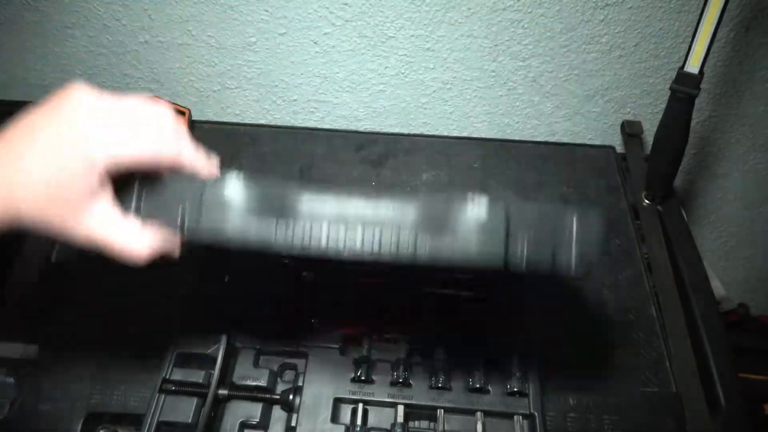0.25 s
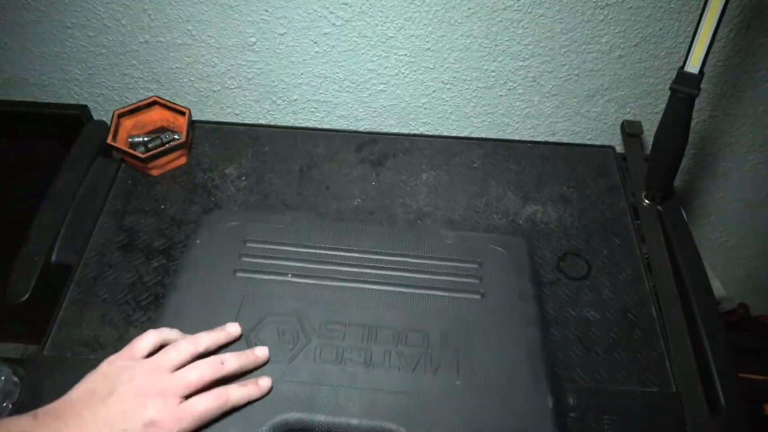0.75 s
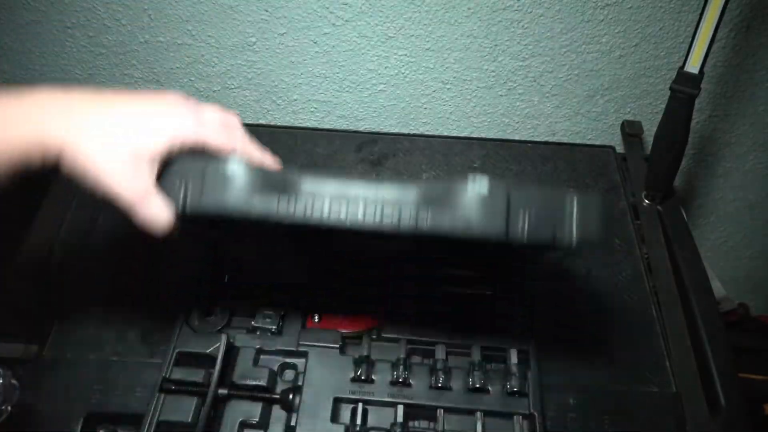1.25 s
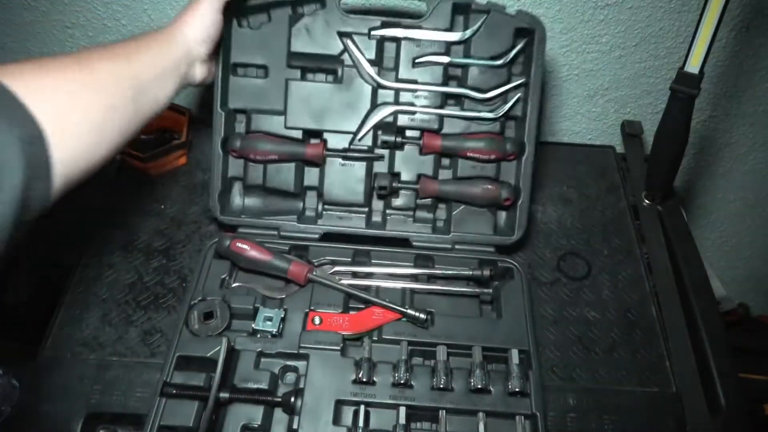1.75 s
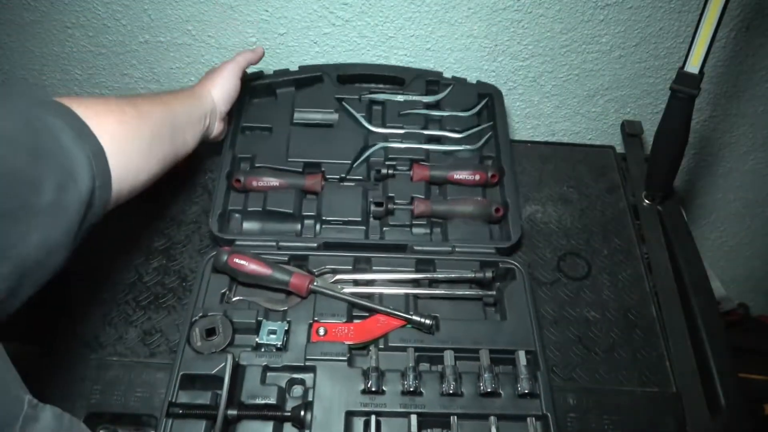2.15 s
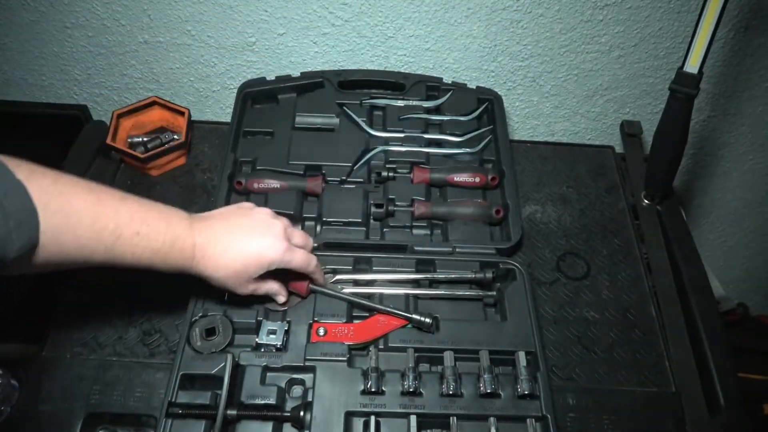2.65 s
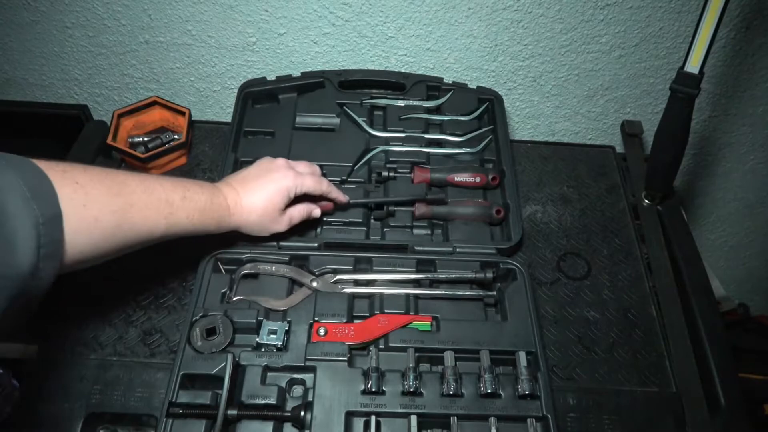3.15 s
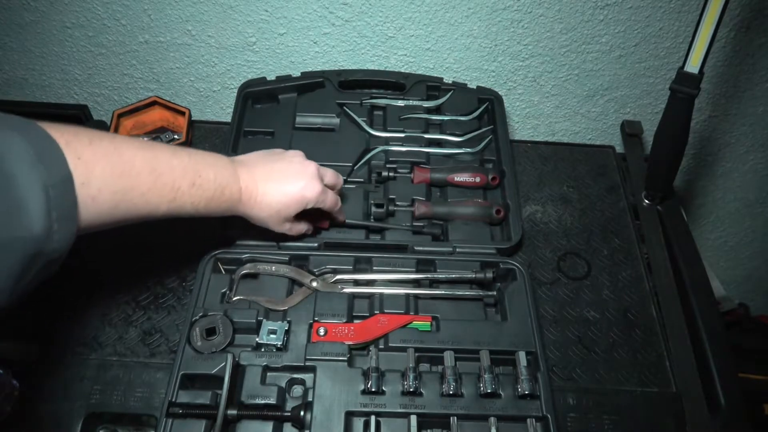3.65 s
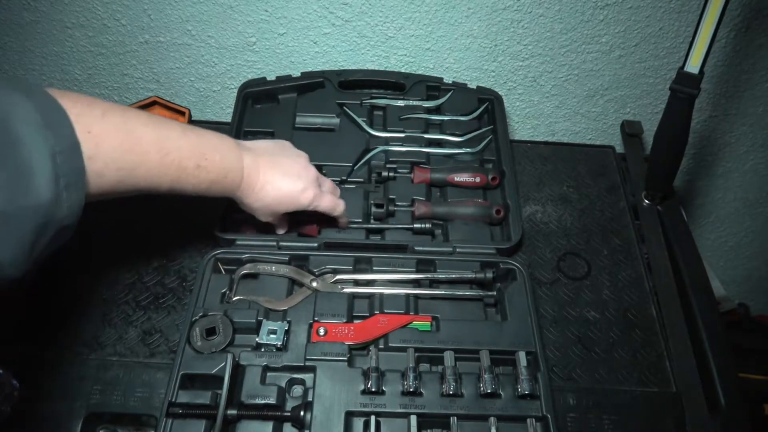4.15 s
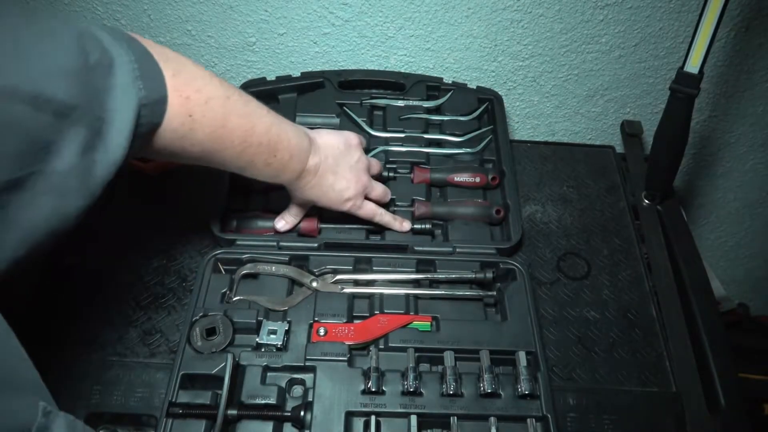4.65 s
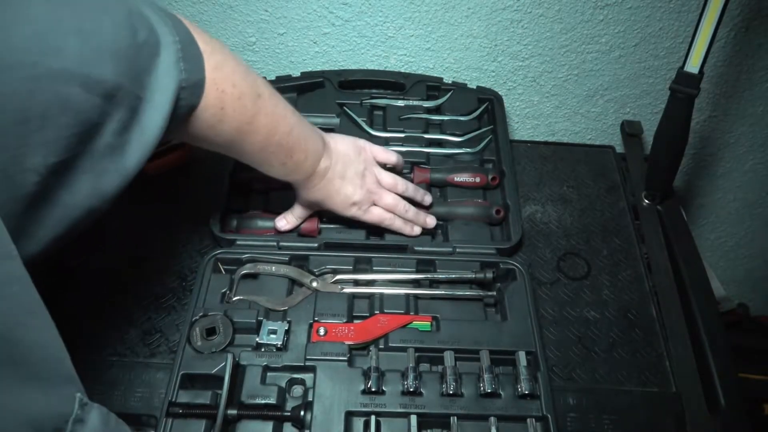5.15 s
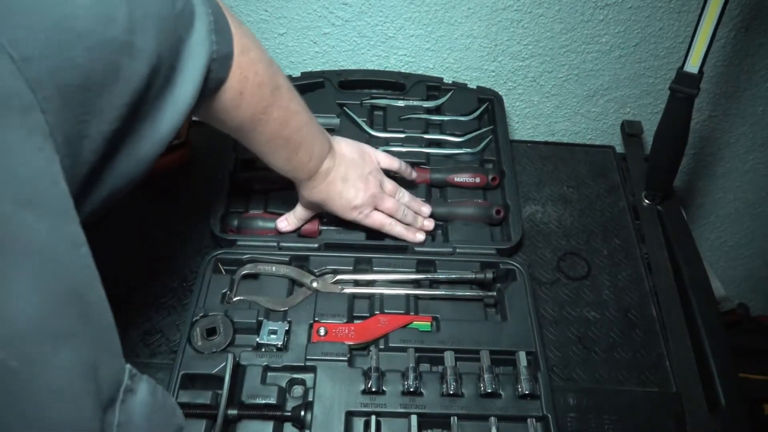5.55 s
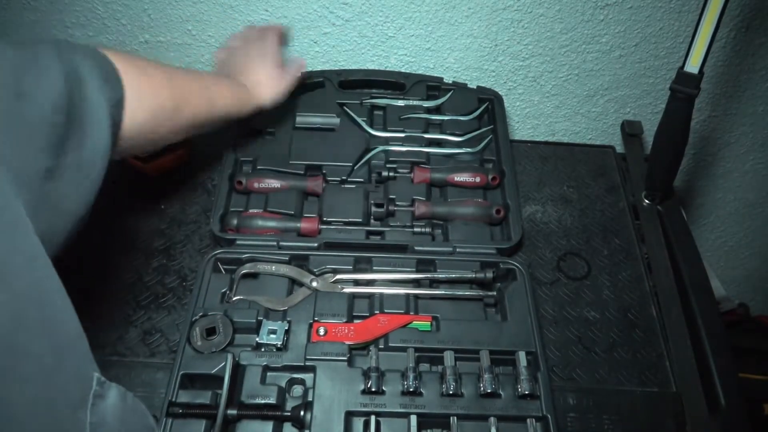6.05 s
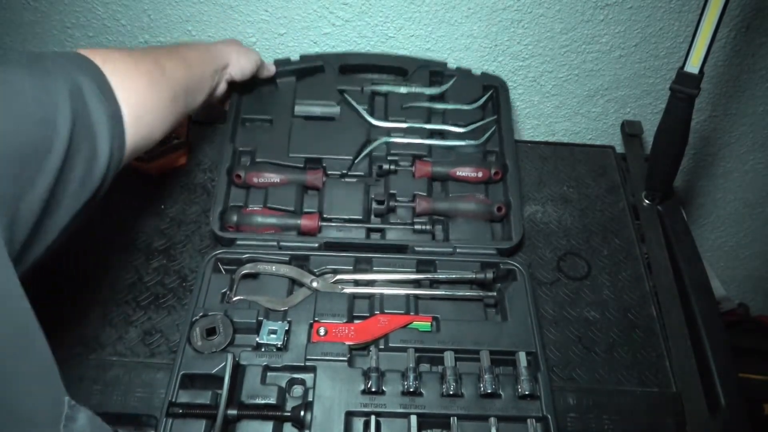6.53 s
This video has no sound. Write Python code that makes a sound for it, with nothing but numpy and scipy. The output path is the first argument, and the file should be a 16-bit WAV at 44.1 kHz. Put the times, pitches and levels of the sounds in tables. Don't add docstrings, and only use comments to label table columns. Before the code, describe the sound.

Close on a workshop bench, a hollow plastic tool case slams shut with rattling tools and a brief steel ring inside. After a quiet moment of rubbing hands, it is thrown open with hard clacks. A loose tool then knocks and clatters into place, with small clicks and scrapes, before one loud snap and a short judder as it is forced home. Light scrapes end it over faint room hum.

```python
import sys
import numpy as np
from scipy import signal
from scipy.fft import rfft, irfft
from scipy.io import wavfile
from scipy.ndimage import uniform_filter1d, minimum_filter1d

SR = 44100
rng = np.random.default_rng(int(sys.argv[2]) if len(sys.argv) > 2 else 0)


def master(y):
    cut = np.clip(np.atleast_2d(y).T, -1, 1)
    pcm = np.round(cut * 32767)
    wavfile.write(sys.argv[1], SR, pcm.astype(np.int16))


def level_to_linear(level):
    exponent = np.asarray(level, float) / 20
    return 10 ** exponent


N = 299288

# pitch_hz, level_db, t60_s
CASE_MODES = [(183, -7, 0.211), (246.26, -9, 0.1716), (349.63, -0.5, 0.0866), (475.2, -4, 0.0996),
              (559.05, -6.5, 0.1073), (724.84, -5.5, 0.066), (907.67, -7.5, 0.0606), (1129.5, -8.5, 0.0305),
              (1656.6, -7, 0.0197), (1980, -13, 0.028), (2598, -9, 0.0106), (3430, -41.5, 0.03706)]
# frequency_hz, level_db (per Hz)
CONTACT_COLOUR = [(120, -41), (400, 16.5), (1000, 15.5), (2000, 13), (4000, 2.5), (6500, -4.5),
                  (9000, -18.5), (13000, -16.5), (17000, -73)]


def evened(x):
    return x / np.sqrt(np.mean(x ** 2) + 1e-20)


def read(points, hz):
    f, value = np.transpose(points)
    return np.interp(np.log(hz + 1), np.log(f + 1), value)


def add(mix, s, sound):
    part = mix[round(s * SR):][:len(sound)]
    part += sound[:len(part)]


def coloured(x, spectrum):
    gain = level_to_linear(read(spectrum, np.fft.rfftfreq(len(x), 1 / SR)))
    return irfft(rfft(x) * gain, len(x))


def highpassed(x, order, edge_hz):
    return signal.sosfilt(signal.butter(order, edge_hz, "high", fs=SR, output="sos"), x)


def fine_fizz(x, edge_hz):
    return signal.sosfiltfilt(signal.butter(2, edge_hz, "high", fs=SR, output="sos"), x)


def patchy(spectrum, patchy_db, flicker_db):
    frames, hz = N // 128 + 5, np.fft.rfftfreq(512, 1 / SR)
    real, imaginary, patches = rng.standard_normal((frames, 257, 3)).T
    patches = uniform_filter1d(patches, size=10, axis=0)
    patches = evened(uniform_filter1d(patches, size=14, axis=1))
    flicker = evened(uniform_filter1d(rng.standard_normal(frames), size=4))
    level_db = read(spectrum, hz)[:, None] + patchy_db * patches + flicker_db * flicker
    z = (real + 1j * imaginary) * level_to_linear(level_db)
    return evened(signal.istft(z, nperseg=512, noverlap=384)[1][:N])


def ring(modes, t):
    hz, db, t60 = np.transpose(modes)[:, :, None]
    return (level_to_linear(db - 60 * t / abs(t60)) * np.sin(2 * np.pi * hz * t)).sum(0)


def swell(peak_s, rise_s, fall_s):
    t = np.arange(-abs(rise_s), 2 * abs(fall_s), 1 / SR)[:SR]
    rise = np.sin(np.pi / 2 * np.clip(1 + t / abs(rise_s), 0, 1)) ** 2
    return peak_s + t, rise * level_to_linear(-30 * np.maximum(t, 0) / abs(fall_s))


def workshop_air():
    # frequency_hz, level_db (per Hz)
    air_colour = [(12, -42), (20, -11.5), (86, 2), (304, -15.5), (370, -6.5), (402, -33.5), (1590, -14.5),
                  (1730, -21.5), (3300, -24.5), (15000, -33), (16300, -43)]
    # pitch_hz, level_db (rms)
    far_hums = [(80.7, -56.5), (371.4, -55), (1556, -64.5)]
    t = np.arange(N) / SR
    waver = evened(uniform_filter1d(rng.standard_normal((len(far_hums), N)), size=3000, axis=1))
    out = level_to_linear(-47.5) * evened(coloured(rng.standard_normal(N), air_colour))
    for (hz, level_db), w in zip(far_hums, waver):
        out += level_to_linear(level_db + 3.0 + 3.18 * w) * np.sin(2 * np.pi * hz * t + 0.734 * w)
    return out


def rubbing():
    # time_s, speed_db (as rustle), pressure_db (as low shuffle)
    strokes = [(0.0, -39, -33), (0.131, -42.5, -41), (0.24, -43, -36), (0.6, -51, -34), (0.79, -38, -37.5),
               (0.94, -46, -32.5), (1.13, -64, -38.5), (1.337, -42, -44), (1.49, -41, -40), (1.8, -42, -40),
               (1.93, -43, -38), (2.11, -36.5, -39.5), (2.44, -57, -44), (3.31, -54.5, -47.5),
               (4.67, -55.5, -52), (5.05, -54, -47.5), (5.9, -50.5, -43.5), (6.79, -45.5, -41.5)]
    # peak_s, rise_s, fall_s (by 30 dB), speed_db, pressure_db
    palm_shoves = [
        (0.429, 0.0525, 0.2877, -18.5, -23.5),
        (0.51, 0.043, -0.0124, -60.5, -25),
        (0.678, 0.173, -0.07, -76.5, -27),
        (1.699, 0.26, 0.29, -34.5, -55),
        (2.27, 0.085, 0.0958, -26.5, -12.5),
        (3.853, 0.1, -0.027, -29, -32.5),
        (4.039, 0.034, 0.0678, -39, -19.5),
        (4.4, 0.126, 0.48, -71.5, -37),
        (5.25, 0.158, 0.767, -70, -39),
        (5.56, 0.066, 0.11, -28.5, -28),
    ]
    # frequency_hz, level_db (per Hz)
    rustle_colour = [(290, -35), (500, 11), (596, -15.5), (833, 7.5), (1080, 5), (2210, 5), (5870, -3),
                     (13300, -26.5), (16300, -36.5)]
    # frequency_hz, level_db (per Hz)
    shuffle_colour = [(30, -46), (70, -19.5), (150, 5.5), (300, -3), (600, -5.5), (1200, -18.5),
                      (2500, -41.5)]
    s, *columns = np.transpose(strokes)
    speed, pressure = (level_to_linear(np.interp(np.arange(N) / SR, s, c)) for c in columns)
    for *shape, speed_db, pressure_db in palm_shoves:
        t, gain = swell(*shape)
        add(speed, t[0], level_to_linear(speed_db) * gain)
        add(pressure, t[0], level_to_linear(pressure_db) * gain)
    fizz_db = np.minimum(6.5 + 0.7863 * 20 * np.log10(speed / pressure), 21)
    rustle = patchy(rustle_colour, 1.71, 1.0)
    bright_rustle = rustle + (level_to_linear(fizz_db) - 1) * fine_fizz(rustle, 8000)
    return speed * bright_rustle + pressure * patchy(shuffle_colour, 1.0, 2.6)


def knock(crack_db, thud_db, thud_hz, t60, tilt_db):
    t = np.arange(4096) / SR
    colour = [(hz, db + tilt_db * np.log2(max(hz, 900) / 2500)) for hz, db in CONTACT_COLOUR]
    burst = (level_to_linear(-60 * t / 0.01774) + level_to_linear(-6.0 - 60 * t / 0.0306)) * (1 - np.exp(-t / 0.000305))
    grains = rfft(rng.standard_normal(len(t)) * burst)
    grains /= uniform_filter1d(abs(grains), size=15)
    crack = coloured(irfft(grains), colour) * level_to_linear(-60 * t / 0.312) * (1 - np.exp(-t / 0.0000467))

    modes = np.tile(CASE_MODES, (2, 1)) * [1, 1, abs(t60) / 0.0509]
    spread = rng.standard_normal(modes.shape) * modes * [.07, 0, .15]
    modes += spread + rng.standard_normal(modes.shape) * [0, 3.0, 0]
    modes[:, 1] -= 4.1 * np.maximum(np.log2(thud_hz / modes[:, 0]), 0)
    modes[:, 0] *= rng.choice([-1, 1], len(modes))
    panel = ring([(thud_hz, 9.0, t60), (thud_hz * rng.uniform(1.05, 1.12), 4.0, t60)], t)
    thud = (ring(modes, t) + panel) * (1 - np.exp(-t / 0.00041))
    return level_to_linear(crack_db) * (crack / abs(crack).max() + level_to_linear(thud_db + 4.0) * thud / abs(thud).max())


def blows():
    # start_s, crack_peak_db, thud_over_crack_db, thud_hz, tilt_db_per_octave
    slams = [(0.196, -12.5, -15, 423, -1), (0.2581, 7, -9.5, 293, -0.5), (0.3515, -11.5, 2.5, 482, -0.5),
             (0.3932, -5.5, 10.5, 505.8, 6.5), (0.4184, -7, 1, 528, -2), (0.4569, -3.5, 3.5, 455, 8.5),
             (0.5005, -10.5, 3.5, 472, -14.5), (0.5132, 0.5, -8, 525, -6), (0.6021, -19, 2, 719, -6),
             (0.6225, -9, 5.5, 488.6, -3), (1.0061, -11.5, -2, 486.6, -3.5), (2.152, -13, 2.5, 387.3, -2),
             (2.1893, -18.5, -19.5, 478.1, 0), (2.2108, -8, -4.5, 393, -2), (2.2628, 4.5, -12, 485, 1),
             (2.3135, -6.5, -1.5, 524, -1), (2.3591, -8.5, 2, 341.6, -1), (2.7564, -8, -8, 705.3, 1),
             (3.0769, 2.5, -3.5, 369.3, -1), (3.379, 8.5, -6, 355, -1.5), (3.4239, 2, -11, 375, 2.5),
             (3.8636, -5.5, -15.5, 451.1, 0.5), (4.0246, -14.5, 7, 352, 1), (5.4805, 5, -11, 221, 2)]
    lid_taps = [(0.211, -3.5, -9.5, 403, -5), (0.2665, -4, 3.5, 329, -5.5), (0.3095, -15, 16, 464.8, 2.5),
                (0.4401, 2, -1.5, 463.4, -13), (0.5397, -7, -3.5, 465.3, -15),
                (0.6548, -27.5, -12.5, 492.2, 8), (0.8632, -28, 1.5, 547.6, 1),
                (1.008, -13.5, -6.5, 862.6, -1), (1.9945, -26, -5.5, 1483, -1.5),
                (2.0298, -29, -2.5, 234.6, -6), (2.1257, -24.5, 0, 388.5, -4.5),
                (2.1688, -9.5, -9, 336, -2), (2.2787, -4.5, 0.5, 239.7, -15.5), (2.3335, -3, 1.5, 448, -3)]
    tool_taps = [(2.6775, -27, -7, 636, -3), (2.7106, -15.5, -2.5, 302.4, -6), (3.0962, -9, -10, 378, -2),
                 (3.5995, -34, 6.5, 339, -1.5), (3.7825, -17.5, -12.5, 2846, -11),
                 (3.7934, -16, 2.5, 340.5, -18), (3.9953, -16, -22, 360, -0.5), (4.0103, -9.5, -3, 215, 3),
                 (4.0434, -6.5, -17, 330, -5.5), (4.1669, -26, 5, 355, -13.5),
                 (4.1757, -9.5, -0.5, 369.8, -8.5), (4.368, -9.5, 2, 370.6, -7), (4.5186, -19.5, 3, 383, 1),
                 (5.008, -38, 2, 197.5, 9.5), (5.1451, -39, 5.5, 329, 8.5), (5.218, -38, 12, 266.4, -17.5),
                 (5.373, -31.5, 11.5, 333.5, 4.5), (5.4082, -41, 14.5, 227, -10),
                 (5.7494, -48, 15.5, 478, -15.5), (5.8365, -34, 2, 365.5, -3),
                 (5.8721, -26, 3.5, 319.5, -27), (5.876, -31, 4, 1097, -17.5),
                 (6.5338, -32, 7.5, 375.8, -14)]
    out = np.zeros(N)
    for table, force_db, t60 in (slams, 5, 0.0458), (lid_taps, 0, 0.0832), (tool_taps, 0, 0.0702):
        for s, crack_db, thud_db, thud_hz, tilt_db in table:
            ring_s = t60 * level_to_linear(-0.11 * tilt_db)
            add(out, s, level_to_linear(force_db) * knock(crack_db, thud_db, thud_hz, ring_s, tilt_db))
    return out


def struck_parts():
    # start_s, peak_db, pitch_hz, t60_s
    part_rings = [(0.1982, -18.5, 1480, 0.029), (0.2, -14, 349, 0.064), (0.3495, -3, 1943, 0.0122),
                  (0.3532, -1.5, 430, 0.029), (0.2665, 4.5, 749, 0.034), (0.329, -11.5, 828, 0.033),
                  (0.4185, 1.5, 825, 0.038), (0.4188, -9.5, 2619, 0.0117), (0.4575, 0.5, 841, 0.05),
                  (0.459, -2, 466, 0.044), (0.5002, -1, 2040, 0.0135), (0.5122, 4.5, 968, 0.0393),
                  (0.5125, -2.5, 1890, 0.0192), (0.522, -13, 3023, 0.167), (0.603, -25, 3023, 0.077),
                  (0.608, -2.5, 512.6, 0.054), (0.6225, 2.5, 533, 0.02931), (0.654, -9.5, 565.7, 0.068),
                  (1.0075, -10, 2414, 0.0152), (1.0072, -15, 2003, 0.0255), (1.012, -17.5, 409.2, 0.318),
                  (1.008, -10, 844.4, 0.0645), (2.1525, 0, 411, 0.037), (2.1893, -7.5, 1535, 0.0245),
                  (2.169, -18, 3710, 0.017), (2.199, -3.5, 400, 0.041), (2.199, -6.5, 662, 0.0275),
                  (2.2, -7, 1008, 0.031), (2.211, -4.5, 1484, 0.026), (2.2578, 9, 392.5, 0.032),
                  (2.258, 0.5, 1696, 0.022), (2.257, -8.5, 3051, 0.0105), (2.257, -8.5, 5570, 0.0115),
                  (2.2588, -16, 7602, 0.00782), (2.263, 0, 1970, 0.0104), (2.279, -3, 1520, 0.0133),
                  (2.291, -13, 1905, 0.01422), (2.304, 2, 333, 0.0503), (2.304, -4, 559, 0.025),
                  (2.305, -4.5, 1476, 0.0215), (2.305, -5, 2631, 0.0138), (2.314, -3, 1497, 0.0212),
                  (2.335, -12.5, 1786, 0.014), (2.341, -5.5, 451, 0.036), (2.36, -6, 1753, 0.0167),
                  (2.7115, -26.5, 771, 0.064), (2.757, -9, 743.7, 0.0306), (2.757, -16.5, 1390, 0.019),
                  (2.762, -13.5, 1686, 0.02), (2.818, -31.5, 2175, 0.033), (2.818, -31.5, 3902, 0.064),
                  (2.822, -30, 4590, 0.03125), (3.076, -15.5, 1307, 0.0105), (3.0778, -8, 2956, 0.0136),
                  (3.088, -2.5, 388.4, 0.035), (3.098, -9.5, 413.9, 0.035), (3.096, -8, 1952, 0.015),
                  (3.096, -8, 1301, 0.052), (3.115, -6, 300.6, 0.049), (3.379, 7, 1035, 0.017),
                  (3.379, 14, 1738, 0.0159), (3.379, 5.5, 3702, 0.0164), (3.379, 3.5, 5317, 0.0173),
                  (3.407, -3, 997, 0.026), (3.424, 2.5, 930, 0.0124), (3.424, -1.5, 2526, 0.0172),
                  (3.424, 3.5, 4890, 0.0116), (3.425, 0, 6020, 0.0123), (3.423, -3, 7600, 0.0104),
                  (3.864, -6.5, 1790, 0.013), (3.864, -3, 2560, 0.0157), (3.864, -12, 3140, 0.009),
                  (3.871, -7, 447, 0.0505), (4.024, -10, 774, 0.0215), (4.094, -21, 2870, 0.0137),
                  (4.1214, -28, 2890, 0.036), (4.1845, -26.5, 6270, 0.0089), (4.1837, -10.5, 373, 0.045),
                  (4.2387, -33, 1391, 0.0157), (4.337, -27.5, 995, 0.021), (4.367, -11, 734, 0.019),
                  (4.374, -8.5, 385, 0.047), (4.491, -18.5, 6162, 0.0096), (4.526, -10, 407.4, 0.0378),
                  (5.2722, -30, 1968, 0.056), (5.4805, 8.5, 648, 0.0178), (5.4816, 4, 1642, 0.0125),
                  (5.48, 0.5, 3375, 0.011), (5.4802, 9, 1139, 0.0138), (5.489, -2.5, 341.8, 0.175),
                  (5.522, -11, 337.2, 0.102), (5.55, -9.5, 544.8, 0.087), (5.573, -12.5, 539.3, 0.061),
                  (5.579, -9.5, 1152, 0.0314), (5.598, -12.5, 343.3, 0.114)]
    out, t = np.zeros(N), np.arange(6144) / SR
    for s, peak_db, hz, t60 in part_rings:
        pair = ring([(hz, peak_db - 2.0, t60), (hz * 0.99535, peak_db - 9.5, t60 * 0.68)], t)
        add(out, s, pair * (1 - np.exp(-t / 0.00025)))
    return out


def rattle(peak_s, rise_s, fall_s, level_db, bright_db, per_s=900):
    t, gain = swell(peak_s, rise_s, fall_s)
    modes = CASE_MODES * np.array([1, 1, .5])
    modes[:, 1] -= 2.7 * np.maximum(np.log2(380 / modes[:, 0]), 0)
    chance, luck, sign = rng.random((SR, 3))[:len(t)].T
    size = level_to_linear(5.45 * np.minimum(-np.log(1 - luck), 4))
    bounces = size * (chance < per_s / SR) * np.sign(sign - .5)
    body = evened(signal.fftconvolve(bounces, ring(modes, np.arange(4096) / SR))[:len(t)])
    hiss = 0.68 * rng.standard_normal(SR)[:len(t)] * bounces.std()
    ticks = evened(coloured(bounces + hiss, CONTACT_COLOUR[:-2] + [(16000, -41.5)]))
    return t[0], level_to_linear(level_db - 13.5) * gain * (body + level_to_linear(bright_db - 8.0) * ticks)


def rattles():
    # peak_s, rise_s, fall_s (by 30 dB), level_db, brightness_db
    shakes = [(0.222, 0.0309, 0.18, -2.5, -8.5), (0.29, 0.0244, 0.2213, 5.5, -2),
              (0.405, 0.05, 0.0977, -2, 2), (0.46, 0.0335, 0.5, -30.5, 19.5), (0.542, 0.074, -1.4, -30, -2),
              (0.626, 0.0366, 0.22, -18.5, -1), (2.145, 0.03095, 0.2063, -27, 18.5),
              (2.204, 0.01874, 0.0178, 5, 6.5), (2.325, 0.0562, 0.0732, -1.5, 12.5),
              (3.448, 0.06, 0.1524, 1.5, 2.5), (3.8, 0.02206, 0.15, -5.5, 1), (3.87, 0.02173, 0.0381, 3, 4),
              (4.022, 0.03576, 0.0506, 2.5, 0.5), (5.481, 0.0088, 0.0156, 3, 14)]
    judders = [
        (5.575, 0.11, 0.1184, -2.5, 8),
    ]
    out = np.zeros(N)
    for row in shakes:
        add(out, *rattle(*row))
    for row in judders:
        add(out, *rattle(*row, per_s=4000))
    return out


def snaps():
    # start_s, peak_db, lower_edge_hz, t60_s
    edge_snaps = [(0.2587, -9, 5000, 0.0113), (0.4564, -12.5, 6000, 0.0117), (0.4194, -10.5, 897, .012),
                  (0.6231, -12, 900, 0.0102), (2.757, -18, 1500, 0.017), (2.825, -27.5, 3000, 0.031),
                  (3.0776, -14, 5000, 0.014), (3.3795, -4, 3000, 0.0113), (3.4239, 0, 8000, 0.0113),
                  (3.7829, -25, 7000, 0.022), (5.871, -23, 6000, 0.0196), (3.8312, -20.5, 4000, 0.021),
                  (4.0107, -22, 5000, .012), (4.046, -28.5, 7000, .01), (4.057, -31, 7000, .008),
                  (4.0946, -25, 3000, 0.0127), (4.1853, -24, 3000, 0.0107), (4.2047, -29, 2500, .012),
                  (4.379, -30.5, 3000, .01), (4.4899, -22, 2800, 0.0145), (5.2172, -29.5, 5000, 0.0287),
                  (5.48, 1.5, 6500, 0.0163), (6.252, -41.5, 5000, .015)]
    out, t = np.zeros(N), np.arange(1024) / SR
    for s, peak_db, edge_hz, t60 in edge_snaps:
        noise = coloured(rng.standard_normal(len(t)), [(3000, 3.5), (14000, -16), (17000, -32.5)])
        bright = evened(highpassed(noise, 2, edge_hz))
        add(out, s, level_to_linear(peak_db - 6.0 - 60 * t / abs(t60)) * bright * (1 - np.exp(-t / .0004)))
    return out


def rod():
    # time_s, level_db
    rod_shake = [
        (0.44, -29.5),
        (0.454, -14.5),
        (0.51, -12),
        (0.55, -18.5),
        (0.587, -49),
        (0.618, -19),
        (0.65, -62),
    ]
    # pitch_hz, level_db, t60_s
    rod_modes = [(996, 0, .09), (1879, -5, .06), (1990, -8, .04), (2234, -11, .06), (3020, -15, .07),
                 (4640, -21, .1), (6040, -32, .08)]
    s, level_db = np.transpose(rod_shake)
    t = np.arange(s[0], s[-1], 1 / SR)
    hits = rng.standard_normal(len(t)) * (rng.random(len(t)) < 1500 / SR)
    sound = evened(signal.fftconvolve(hits, ring(rod_modes, np.arange(16384) / SR))[:len(t)])
    return s[0], level_to_linear(np.interp(t, s, level_db) + 0.2) * sound * signal.windows.tukey(len(t), .1)


def grit():
    # frequency_hz, level_db (per Hz)
    grit_colour = [(350, -21), (600, -2), (1490, -2), (3500, -7), (5900, -9.5), (7300, -20.5), (13400, -30),
                   (16300, -49.5)]
    size = level_to_linear(2.6 * np.minimum(rng.exponential(1, N), 5))
    snags = size * (rng.random(N) < 500 / SR) * rng.choice([-1, 1], N)
    return patchy(grit_colour, 2, 1) + level_to_linear(-14) * evened(coloured(snags, grit_colour))


def scrapes():
    # peak_s, rise_s, fall_s (by 30 dB), level_db, fizz_db (relative)
    scrape_strokes = [(1.093, 0.087, 0.13, -31.5, 3.5), (2.78, 0.0056, -0.31, -28, -3.5),
                      (2.825, 0.014, -0.058, -22, 3.5), (3.735, 0.0105, 0.34, -23.5, 3.5),
                      (3.855, 0.034, 0.1119, -17.5, 2.5), (3.992, 0.0325, 0.0942, -23, 11.5),
                      (4.125, 0.0227, 0.1748, -29, 0), (4.21, 0.043, 0.11, -27, -3),
                      (4.28, 0.051, 0.0457, -28, -0.5), (4.373, 0.084, -0.46, -36, 7),
                      (4.475, 0.02, 0.0471, -31.5, 15), (4.528, 0.0377, 0.0524, -27, 10.5),
                      (5.218, 0.0092, 0.78, -43.5, 20), (5.281, 0.038, -0.27, -30.5, -6),
                      (5.479, 0.0133, 0.0239, -5, 0.5), (5.875, 0.00555, 0.26, -39.5, 12),
                      (6.27, 0.0264, 0.01, -41.5, 22), (6.345, 0.08, 0.3042, -32, 15),
                      (6.602, 0.0072, 0.075, -27, 11), (6.702, 0.045, 0.02, -29.5, 15.5),
                      (6.78, 0.02074, -1.3, -35.5, 10)]
    out, friction = np.zeros(N), grit()
    for *shape, level_db, fizz_db in scrape_strokes:
        t, gain = swell(*shape)
        part = friction[round(t[0] * SR):][:len(t)]
        bright = part + (level_to_linear(fizz_db) - 1) * fine_fizz(part, 7500)
        add(out, t[0], level_to_linear(level_db - 10.0) * gain[:len(part)] * bright)
    return out


def tick(peak_db, ring_hz, t60):
    t = np.arange(2048) / SR
    partials = [(1, 11.5), (1.09, 1.5), (1.3, -5), (1.75, -30.5), (2.3, -26.5)]  # (ratio, dB)
    modes = [(ring_hz * ratio * rng.uniform(1.0, 1.04), db, t60) for ratio, db in partials]
    rough = 1 + 1.2 * uniform_filter1d(rng.standard_normal(len(t)), size=8)
    sound = ring(modes, t) * rough * (1 - np.exp(-t / 0.00091))
    return level_to_linear(peak_db + 5.5) * sound / abs(sound).max()


def steel_ticks():
    # start_s, peak_db, lowest_ring_hz, t60_s
    touches = [(1.7656, -35, 9920, 0.00628), (2.713, -40.5, 6070, 0.0407), (2.757, -14, 3790, 0.0134),
               (2.7623, -19.5, 5020, 0.01396), (2.823, -26, 3843, 0.01342), (3.378, -13.5, 5180, 0.0108),
               (3.424, -16.5, 2540, 0.0081), (2.2119, -15, 4715, 0.0084), (3.864, -12, 2673, 0.014),
               (4.0242, -20.5, 3360, 0.0127), (4.0567, -25, 2700, 0.0154), (4.095, -30.5, 4841, 0.0063),
               (4.1858, -30.5, 4900, 0.0028), (4.2053, -25.5, 3757, 0.0054), (4.3676, -20.5, 3538, 0.0058),
               (4.4915, -21.5, 3480, 0.0032), (4.7656, -40.5, 3417, 0.0118), (5.01, -41, 3430, 0.019),
               (5.2714, -42, 3580, 0.015), (5.8709, -32.5, 5730, 0.0032), (6.5998, -36.5, 2750, 0.01766),
               (6.7009, -36, 2534, 0.037)]
    out = np.zeros(N)
    for s, *row in touches:
        add(out, s, tick(*row))
    return out


def stand_jolt():
    # pitch_hz, level_db, t60_s
    stand_mode = [
        (40.4, 6.5, 0.0123),
    ]
    return 5.479, ring(stand_mode, np.arange(8192) / SR)


def room(x):
    # frequency_hz, t60_s
    room_decay = [(150, 0.296), (400, 0.187), (1000, 0.2023), (3000, 0.1867), (7000, 0.233), (12000, 0.098)]
    taps = np.zeros((3, SR // 3))
    at = np.arange(120, SR // 3 - 20, 20) + rng.integers(0, 20, (3, (SR // 3 - 121) // 20))
    np.put_along_axis(taps, at, rng.choice([-1., 1.], at.shape), axis=1)
    hz, t, z = signal.stft(taps, SR, nperseg=256)
    decay = level_to_linear(-60 * t / abs(read(room_decay, hz))[:, None])
    tails = signal.istft(z * decay, SR, nperseg=256)[1]
    turns = np.sqrt(2 / 3) * np.cos(2 * np.pi * (40 * np.arange(N) / SR + np.arange(3)[:, None] / 3))
    return signal.oaconvolve(x * turns, tails / np.linalg.norm(tails[0]), axes=1).sum(0)[:N]


def scene():
    case = blows() + rattles() + steel_ticks()
    add(case, *rod())
    case = highpassed(case, 4, 140)
    case += scrapes()
    rings = struck_parts()
    to_room = case + level_to_linear(-6) * rings
    mix = case + rings + level_to_linear(-6.0) * room(to_room)
    mix += rubbing() + workshop_air() + snaps()
    add(mix, *stand_jolt())
    return mix[None]


def band_limit(x):
    return signal.sosfilt(signal.butter(12, 15900, fs=SR, output="sos"), x)


def record(dry, limit_db=-10.0, share=0.644, recover_db_per_s=203.0):
    power_db = 10 * np.log10(abs(uniform_filter1d(dry[0] ** 2, size=200)) + 1e-12)
    ahead_db = np.roll(-minimum_filter1d(-power_db, size=401), shift=-200)
    fall = np.arange(N) * recover_db_per_s / SR
    held_db = np.maximum.accumulate(ahead_db + fall) - fall
    over_db = np.maximum(held_db - limit_db, 0)
    ducked = dry / level_to_linear(np.clip(share, 0, 1) * uniform_filter1d(over_db, size=40))
    return band_limit(np.clip(ducked, -1, 1))


dry = scene()
out = record(dry)
master(out)
```